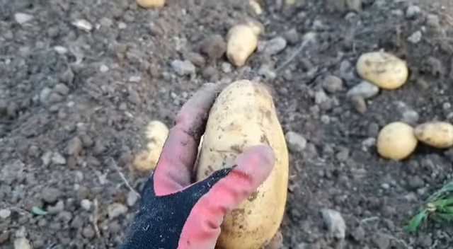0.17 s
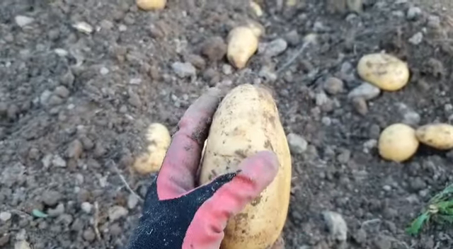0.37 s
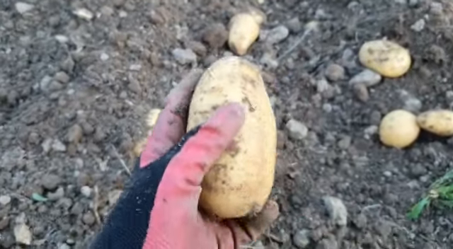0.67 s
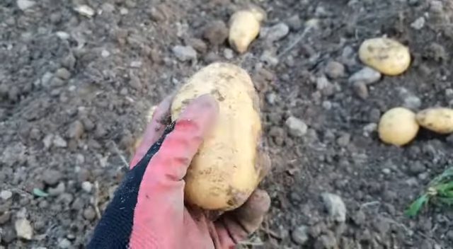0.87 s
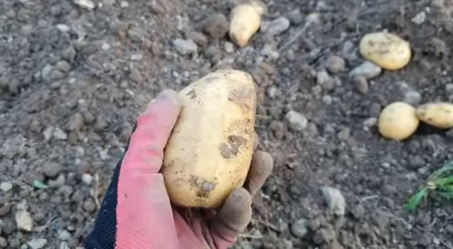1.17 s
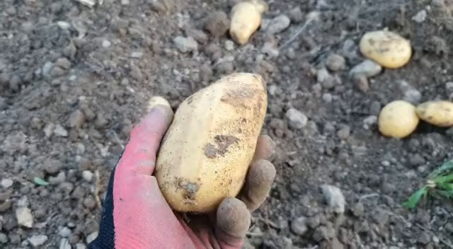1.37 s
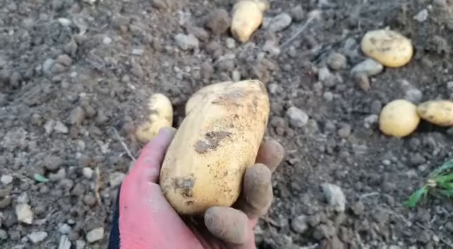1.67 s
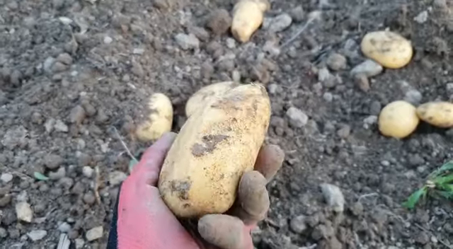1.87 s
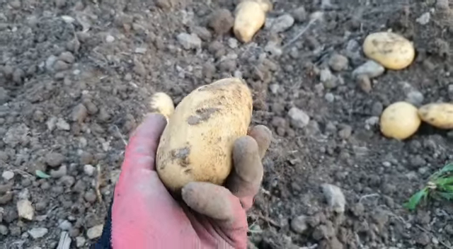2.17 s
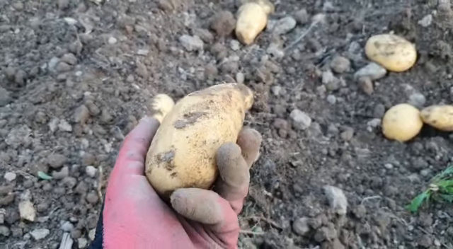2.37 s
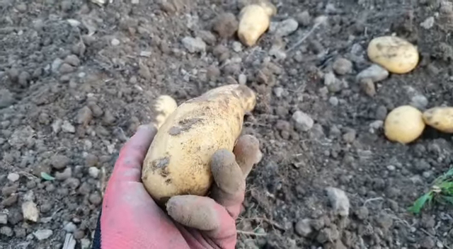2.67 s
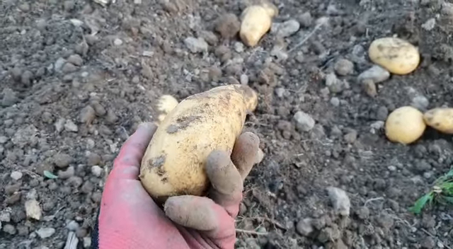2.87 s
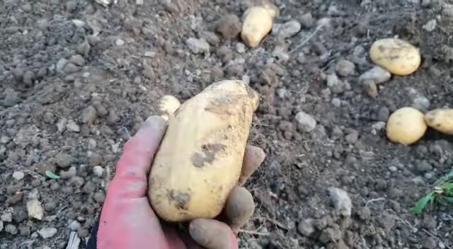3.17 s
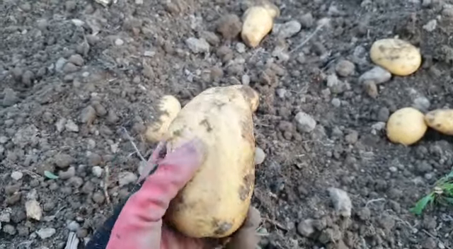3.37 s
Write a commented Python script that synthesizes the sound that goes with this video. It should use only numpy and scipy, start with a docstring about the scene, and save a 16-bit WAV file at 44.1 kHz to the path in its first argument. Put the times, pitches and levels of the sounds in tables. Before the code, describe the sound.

A diesel tractor idles steadily with a low thudding hum, clatter and loose metallic rattles.

```python
"""A three-cylinder diesel tractor idles in a potato field, its governor hunting.
Each firing excites a filter for the exhaust thud and swells noise bands for the combustion clatter.
Shaped noise gives the rumble and wavering sines the whine; loose steel parts clack and ring as decaying modes.
Close by, a few small hard clicks, grit noise with decaying modes, sound as a potato is turned in a gloved hand."""
import sys
import numpy as np
from scipy import signal
from scipy.fft import rfft, irfft
from scipy.io import wavfile

SR = 44100
rng = np.random.default_rng(int(sys.argv[2]) if len(sys.argv) > 2 else 0)


def generate_wav(signal):
    """Clip the signal to [-1, 1] and save it as 16-bit WAV at the path in sys.argv[1]."""
    frames = np.transpose(np.atleast_2d(signal))
    scaled = np.clip(frames, -1, 1) * 32767
    pcm = np.round(scaled).astype(np.int16)
    wavfile.write(sys.argv[1], SR, pcm)


N = 155673
TIME = np.arange(N) / SR

# Stereo balance of the machine. Each row: frequency in Hz, left over right in dB.
BALANCE_DB = [(150, 2.5), (450, 1), (1200, 1.5), (2000, -0.5), (5500, -1.5), (12000, -2)]


def from_db(db):
    """Amplitude ratio: 20 dB is a factor of ten."""
    return 10 ** (np.asarray(db) / 20)


def rms_one(x):
    """Normalization to unit root-mean-square amplitude."""
    return x / np.sqrt(np.mean(x ** 2) + 1e-20)


def at_hz(points, hz):
    """Linear interpolation on a logarithmic frequency axis, held flat beyond the ends."""
    f, value = np.transpose(points)
    return np.interp(np.log(hz), np.log(f), value)


def panned(db):
    """Intensity panning: half the level difference raises the left, half lowers the right."""
    return from_db(np.array([[.5], [-.5]]) * db)


def drift(corner_hz):
    """Random modulation: noise through two equal real poles, scaled to unit rms."""
    step = 40  # samples between computed points
    warm_up = 2000  # points dropped while the filter settles
    pole = np.exp(-2 * np.pi * corner_hz * step / SR)
    noise = rng.standard_normal(N // step + 2 + warm_up)
    slow = signal.lfilter([1], [1, -2 * pole, pole * pole], noise)[warm_up:]
    return np.interp(np.arange(N) / step, np.arange(len(slow)), rms_one(slow))


def strike(times, gains, response):
    """Superposition: an impulse train convolved with one response."""
    train = np.zeros(N)
    inside = (times >= 0) & (times < (N - 1) / SR)
    np.add.at(train, (times[inside] * SR).astype(int), gains[inside])
    return signal.fftconvolve(train, response)[:N]


def burst(rise_s, fall_s):
    """Transient envelope: a smooth onset times exponential decay, half a second long with peak 1."""
    t = TIME[:SR // 2]
    shape = (1 - np.exp(-(t / rise_s) ** 2)) * np.exp(-t / fall_s)
    return shape / shape.max()


def noise_bands(spectrum, count):
    """Subtractive synthesis: (centre Hz, stereo band) pairs of filtered noise, rms 1 when combined."""
    # Likeness of left and right. Each row: frequency in Hz, correlation (no unit).
    likeness = [(60, 0.93), (250, 0.94), (700, 0.91), (1400, 0.75), (2800, 0.47), (5500, 0.032),
                (11000, 0.091)]
    edges = np.geomspace(spectrum[0][0], min(spectrum[-1][0], SR / 2 - 10), count + 1)
    white = rng.standard_normal((2, 2, N))  # neighbouring bands take turns with two noise pairs
    bands = []
    for k, (low, high) in enumerate(zip(edges, edges[1:])):
        band_pass = signal.butter(2, [low, high], "band", fs=SR, output="sos")
        mid, side = signal.sosfilt(band_pass, white[k % 2])
        hz = np.sqrt(low * high)
        alike = np.clip(at_hz(likeness, hz), -1, 1)
        pair = np.sqrt(1 + alike) * mid + np.sqrt(1 - alike) * side * [[1], [-1]]
        gains = from_db(at_hz(spectrum, hz)) * panned(at_hz(BALANCE_DB, hz))
        bands.append((hz, gains * pair))
    total = np.sqrt(sum(np.mean(band ** 2) for _, band in bands))
    return [(hz, band / total) for hz, band in bands]


def causal_response(spectrum, size=8192):
    """Minimum phase: folding the cepstrum of a magnitude spectrum gives a causal impulse response."""
    hz = np.maximum(np.arange(size // 2 + 1) * SR / size, 1)
    # past the last row the level falls 12 dB per octave
    rolloff_db = 40 * np.log10(np.maximum(hz / spectrum[-1][0], 1))
    cepstrum = irfft(np.log(from_db(at_hz(spectrum, hz) - rolloff_db)))
    folded = np.r_[cepstrum[0], 2 * cepstrum[1:size // 2]]
    return irfft(np.exp(rfft(folded, size)))


def firings(speed, count=126):
    """Integrated firing rate: each whole count is a firing, with strength and lateness by cylinder."""
    # Cylinders in firing order. Each row: mean strength in dB, mean lateness in milliseconds.
    cylinders = [(1.5, .35), (1.7, -0.28), (0.87, 0)]
    first_firing_s, spread_db, jitter_ms = 0.01108, 0.68, .08
    number = np.arange(count)
    db, late_ms = np.array(cylinders)[number % len(cylinders)].T
    chance = rng.standard_normal((count, 2))
    late_s = (late_ms + jitter_ms * chance[:, 0]) / 1000
    fired = np.cumsum(speed) / SR
    # firings beyond the end are put at 10 s, where strike drops them
    times = first_firing_s + np.interp(number, fired, TIME, right=10) + late_s
    return times, from_db(db + spread_db * chance[:, 1])


def exhaust(times, gains):
    """Impulse excitation: each puff thuds through pipe and silencer and echoes, over a noise rumble."""
    # Response of pipe and silencer to one puff. Each row: frequency in Hz, relative level in dB.
    puff_spectrum = [(15, -19.5), (34, -14), (52, -6), (68, 2.5), (102, 0.5), (135, -2.5), (169, -3),
                     (203, -8), (237, -13.5), (271, -16.5), (305, -22), (345, -31.5), (400, -45),
                     (900, -50)]
    # Reflections in the pipe. Each row: delay in seconds, amplitude gain (no unit).
    pipe_echoes = [(0.0136, 0.1), (0.019, 0.36)]
    # Rumble of the running machine. Each row: frequency in Hz, relative level in dB per Hz.
    rumble_spectrum = [(20, -27), (42, -38), (62, -7.5), (120, -6), (190, -8), (250, -2), (300, -11.5),
                       (350, -17.5), (410, -26), (800, -23)]
    thud_rms_db, rumble_rms_db = -20, -34.5
    thud = causal_response(puff_spectrum)
    thuds = strike(times, gains, thud)
    for delay, gain in pipe_echoes:
        thuds = thuds + strike(times + delay, gains * gain, thud)
    rumble = sum(band for _, band in noise_bands(rumble_spectrum, count=18))
    # the puffs have negative polarity
    return -from_db(thud_rms_db) * rms_one(thuds - thuds.mean()) + from_db(rumble_rms_db) * rumble


def clatter(times):
    """Amplitude modulation: steady noise off the block swells in a knock just after each firing."""
    # Combustion clatter. Each row: frequency in Hz, relative level in dB per Hz.
    clatter_spectrum = [(300, -17), (425, -8), (530, -0.5), (700, -3), (840, -5), (960, -1), (1120, 0),
                        (1300, -1), (1500, -8), (1850, 0), (2100, -9.5), (2450, 1.5), (2750, -8.5),
                        (3020, -11), (3300, -7.5), (4000, -11), (5300, -17.5), (7060, -15.5), (7700, -29),
                        (9500, -32.5), (12000, -25.5), (16000, -36)]
    # Height of a typical knock over the steady clatter. Each row: frequency in Hz, amplitude ratio.
    knock_depth = [(500, .1), (1200, 0.14), (2000, 1.0), (3500, 0.26), (9000, 0.39)]
    rms_db, knock_delay_s, knock_spread_db = -34, 0.0068, 3
    strengths = from_db(knock_spread_db * rng.standard_normal(len(times)))
    knocks = strike(times + knock_delay_s, strengths, burst(rise_s=0.002, fall_s=0.0045))
    out = 0
    for hz, band in noise_bands(clatter_spectrum, count=38):
        out = out + band * (1 + at_hz(knock_depth, hz) * knocks)
    return from_db(rms_db) * rms_one(out)


def whines(speed):
    """Frequency modulation: shafts and panels sing at pitches that partly follow the engine and waver."""
    # Hum and gear whine. Each row: mean pitch in Hz, rms level in dB ahead of the stereo balance.
    tones = [(122.5, -39.5), (369, -52.5), (510, -53), (712, -57), (985, -54), (1092, -50), (1234, -51.5),
             (1694, -51.5)]
    follows = .3  # exponent of pitch on engine speed
    wander, waver_db = .002, 2.5  # rms fraction of pitch, rms level change
    out = 0
    for hz, db in tones:
        pitch = hz * (speed / speed.mean()) ** follows * (1 + wander * drift(21))
        tone = np.sin(2 * np.pi * np.cumsum(pitch) / SR) * from_db(waver_db * drift(6))
        out = out + from_db(db) * rms_one(tone) * panned(at_hz(BALANCE_DB, hz))
    return out


def loose_steel():
    """Modal excitation: each clack or lighter random rattle is a noise crash with ringing steel modes."""
    # Each row: start in seconds, level in dB before the crash trim and mode levels,
    # body near 2 kHz in relative dB, top above 8 kHz in relative dB.
    clacks = [(0.0647, -31, -2, -15), (0.198, -33, -4, -10), (0.2429, -33.5, 11, -17),
              (0.371, -31, -6, -17), (0.3934, -29.5, -3, -11), (0.4397, -25, 0, -12),
              (0.5848, -30.5, 13.5, -9.5), (0.6548, -33.5, 6, -18), (0.7444, -31, -6, -11),
              (0.849, -30, 2, -16), (0.9698, -34, 10, -14), (0.9933, -28.5, 10, -17),
              (1.042, -30.5, -7, -17), (1.1873, -31, -7, -17), (1.2529, -30.5, 3, -17),
              (1.2867, -34, -1, -12), (1.368, -31, -1, -16), (1.3917, -31.5, -3, -21),
              (1.4096, -36, 4, -17), (1.44, -28, 5, -21), (1.5641, -29, 8, -9), (1.6352, -32, 5, -16),
              (1.7864, -26.5, 4, -14), (1.8323, -32, 10, -20), (1.9941, -24, 10, -9.5),
              (2.0366, -28.5, 10.5, -18), (2.1619, -31.5, 4, -17), (2.1786, -29, 8, -17),
              (2.233, -35, 4, -23), (2.3906, -29, 9.5, -10), (2.4357, -28.5, -11, -13),
              (2.4912, -36, -6, -11), (2.552, -36, -9, -16), (2.5722, -34, -6, -11), (2.6037, -37, -1, -5),
              (2.6322, -29, -3, -18), (2.7774, -32.5, 8, -15), (2.829, -28.5, 9, -16),
              (2.9779, -32, 4, -12), (3.0278, -27, 3, -13), (3.156, -28, 0, -16), (3.1774, -35, 4, -13),
              (3.24, -30, 1, -17), (3.3772, -27.5, 8.5, -14.5), (3.442, -34, 12, -19)]
    # Colour of a crash. Each row: frequency in Hz, relative level in dB per Hz.
    clack_colour = [(500, -4), (1300, -30), (1850, 6.5), (2450, 9.5), (3100, -3), (4500, 3.5), (7000, 0),
                    (8500, -9), (12000, -6.5), (16000, -16)]
    # Modes of the steel. Each row: frequency in Hz, level in dB re the clack, 60 dB decay time in seconds.
    steel = [(1770, -7, 0.057), (1917, -5.5, 0.062), (2394, -4.5, 0.086), (3586, -15.5, 0.18),
             (3870, -14.5, 0.31), (3910, -12, 0.24), (4707, -11, 0.064), (5450, -9.5, 0.059),
             (6800, -14.5, 0.29), (6750, -18, 0.18), (7110, -14, .1), (7480, -15, 0.045)]
    crash_trim_db, rise_s, fall_s = -4, 0.0023, 0.0074
    typical_body_db, typical_top_db = 4, -12.5
    rattles_per_s, rattle_db, rattle_spread_db = 17, -40.5, 2.5
    ring_spread_db, ring_flutter_db = 1.5, 3

    rattles = []
    for _ in range(int(rattles_per_s * N / SR)):
        level_db = rattle_db + rattle_spread_db * rng.standard_normal()
        rattles.append((rng.random() * N / SR, level_db, typical_body_db, typical_top_db))
    s, db, body_db, top_db = np.transpose(list(clacks) + rattles)

    crash_db = db + crash_trim_db
    shape = burst(rise_s, fall_s)
    body = strike(s, from_db(crash_db + body_db - typical_body_db), shape)
    middle = strike(s, from_db(crash_db), shape)
    top = strike(s, from_db(crash_db + top_db - typical_top_db), shape)
    out = 0
    for hz, band in noise_bands(clack_colour, count=16):
        out = out + band * (body if hz < 3000 else middle if hz < 8000 else top)

    for hz, mode_db, t60 in steel:
        ring = burst(rise_s, t60 / np.log(1000)) * np.sin(2 * np.pi * hz * TIME[:SR // 2])
        # left and right differ in gain and, by up to one period, in onset
        gains = from_db(db + mode_db + ring_spread_db * rng.standard_normal((2, len(s))))
        lags = rng.random((2, len(s))) / hz
        flutter = rms_one(from_db(ring_flutter_db * drift(54)))
        rings = np.array([strike(s + lag, g, ring) for lag, g in zip(lags, gains)])
        out = out + flutter * rings * panned(at_hz(BALANCE_DB, hz))
    return out


def close_clicks():
    """Impact of small hard bits: a gritty noise scrape with damped, bright resonances."""
    # Each row: start in seconds, level in dB, pitch in Hz, left over right in dB.
    clicks = [(.538, -31, 3910, 0), (1.413, -28, 3210, 3), (1.584, -14.5, 4670, -3.5),
              (1.7132, -23, 4140, 2.5), (2.362, -32, 3340, 0)]
    # Each row: multiple of the pitch (no unit), level in dB re the click, 60 dB decay time in seconds.
    click_modes = [(.68, -9, 0.073), (.73, -13.5, .035), (.96, -17, .025), (1, -4, .032),
                   (1.07, -13, 0.012), (1.33, -11, 0.01)]
    rise_s, grit_fall_s, grit_db, flutter_db = 0.0023, .005, -8, 3
    grit_band = signal.butter(2, [2500, 5730], "band", fs=SR, output="sos")
    out, t = np.zeros((2, N)), TIME[:SR // 2]
    for s, db, pitch, pan_db in clicks:
        grit = signal.sosfilt(grit_band, rng.standard_normal((2, len(t))))
        sound = from_db(grit_db) * rms_one(grit) * burst(rise_s, grit_fall_s)
        for multiple, mode_db, t60 in click_modes:
            phase = rng.random((2, 1)) * .5  # cycles, apart for left and right
            tone = np.sin(2 * np.pi * (pitch * multiple * t + phase))
            flutter = from_db(flutter_db * drift(150)[:len(t)])
            sound = sound + from_db(mode_db) * burst(rise_s, t60 / np.log(1000)) * tone * flutter
        start = int(s * SR)
        out[:, start:start + len(t)] += from_db(db) * panned(pan_db) * sound
    return out


def scene():
    """Linear superposition of the idling tractor and the close clicks."""
    # Engine speed. Each row: time in seconds, firings per second.
    speed_points = [(0, 34.27), (0.36, 33.96), (0.56, 34.13), (0.95, 33.13), (1.17, 34.15), (1.6, 34.42),
                    (2.0, 33.28), (2.17, 34.08), (2.37, 33.87), (2.66, 34.34), (3.05, 33.1), (3.27, 34.3),
                    (3.53, 33.5)]
    speed = np.interp(TIME, *np.transpose(speed_points))
    times, gains = firings(speed)
    tractor = exhaust(times, gains) + clatter(times) + whines(speed) + loose_steel()
    return tractor + close_clicks()


def record(dry):
    """Low-pass filtering: a steep elliptic filter cuts the top above 15.9 kHz."""
    # order 12, 0.1 dB ripple below the cutoff, 80 dB rejection beyond
    low_pass = signal.ellip(12, .1, 80, 15900, fs=SR, output="sos")
    return signal.sosfilt(low_pass, dry)


dry = scene()
out = record(dry)
generate_wav(out)
```